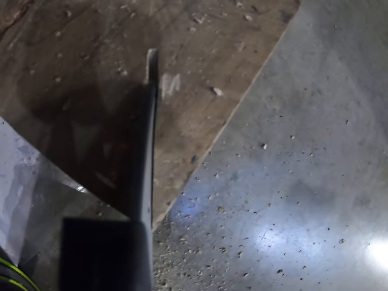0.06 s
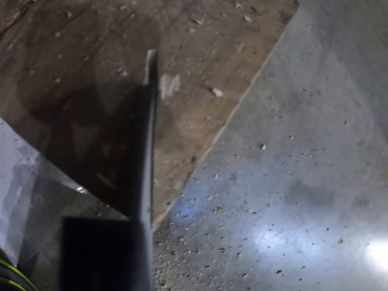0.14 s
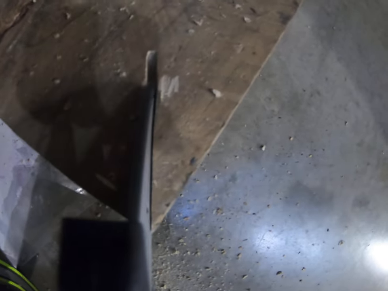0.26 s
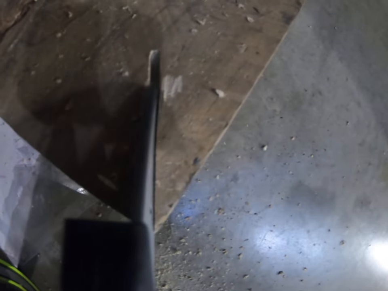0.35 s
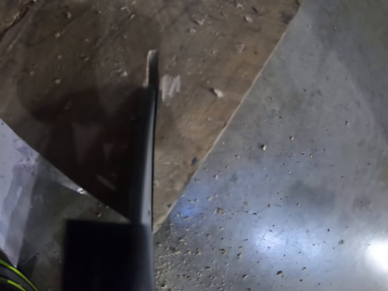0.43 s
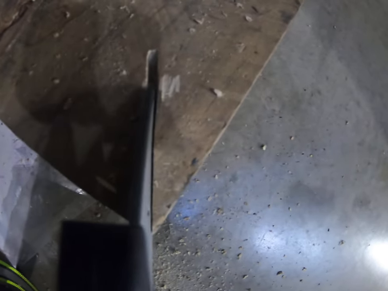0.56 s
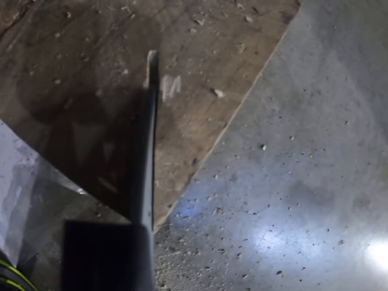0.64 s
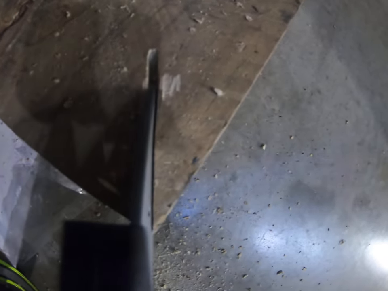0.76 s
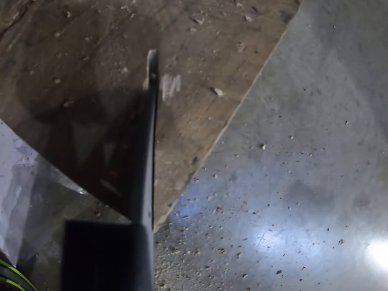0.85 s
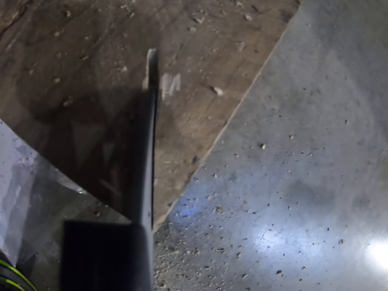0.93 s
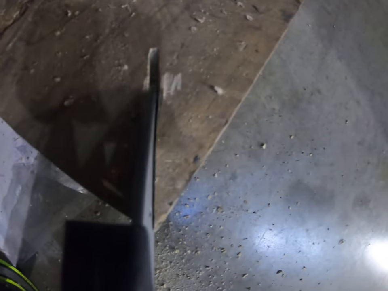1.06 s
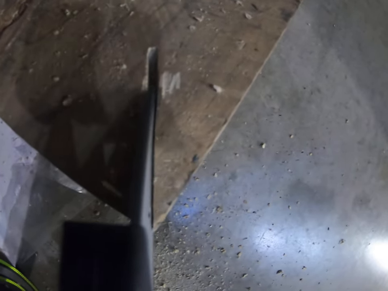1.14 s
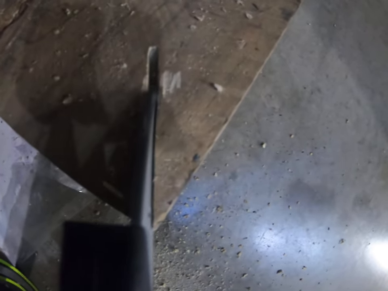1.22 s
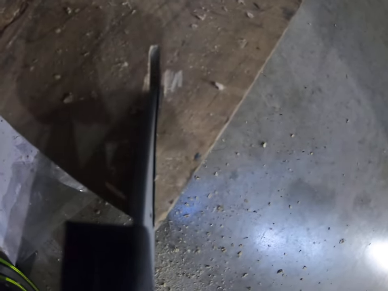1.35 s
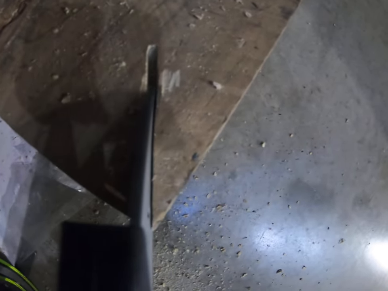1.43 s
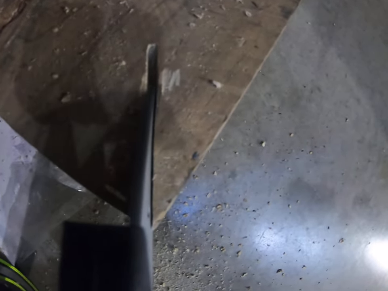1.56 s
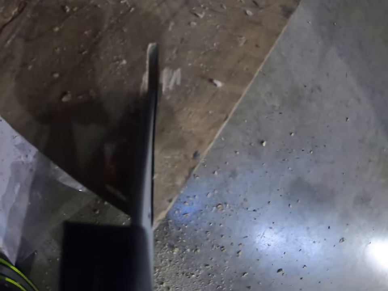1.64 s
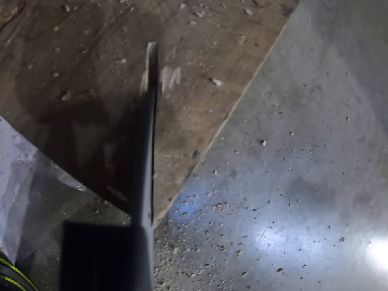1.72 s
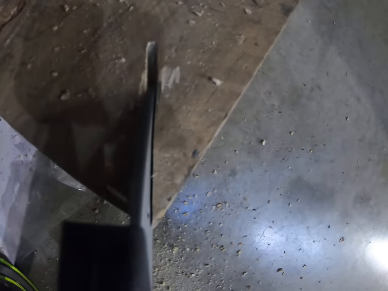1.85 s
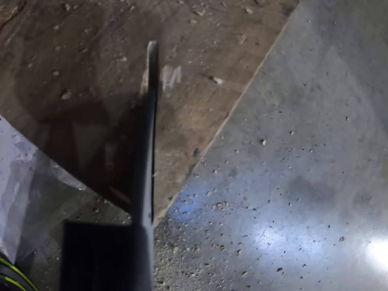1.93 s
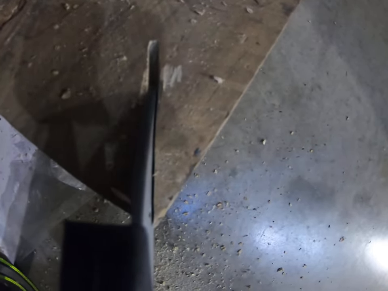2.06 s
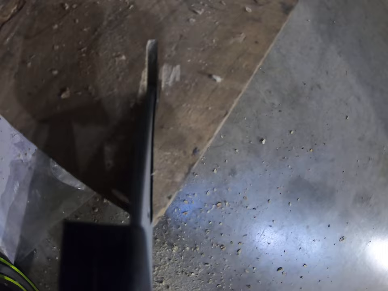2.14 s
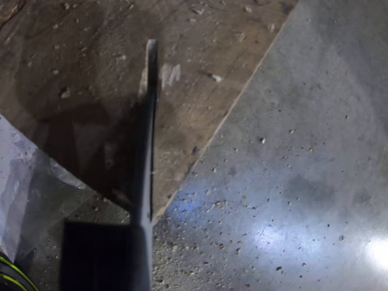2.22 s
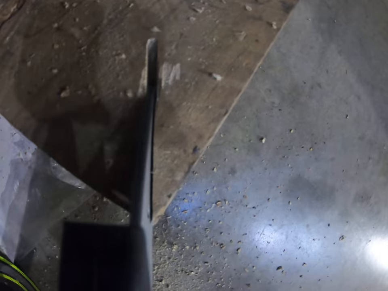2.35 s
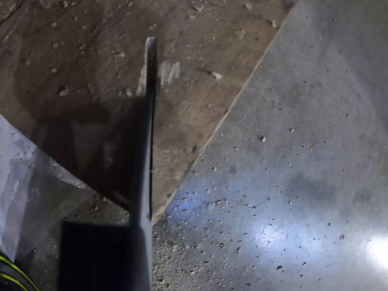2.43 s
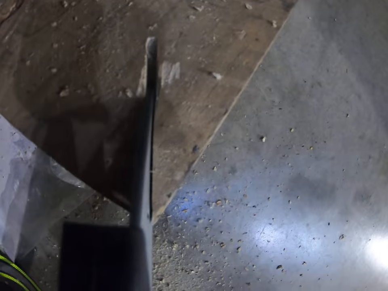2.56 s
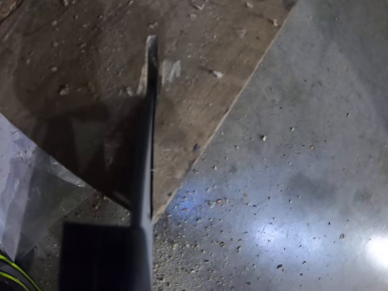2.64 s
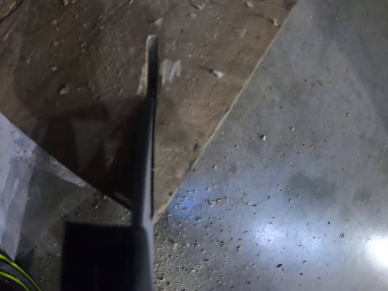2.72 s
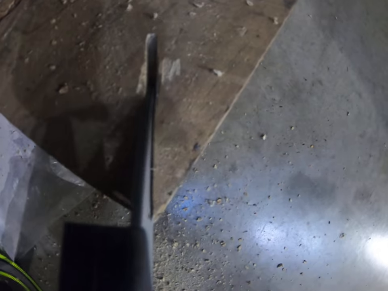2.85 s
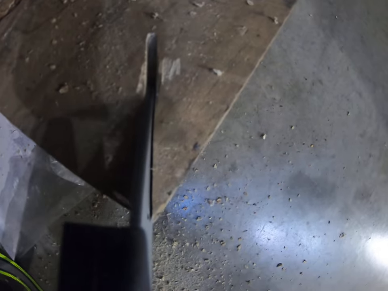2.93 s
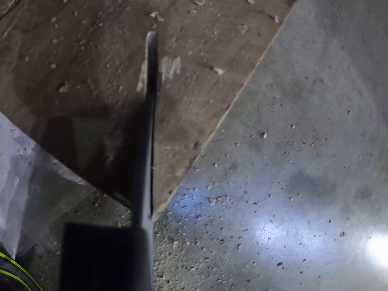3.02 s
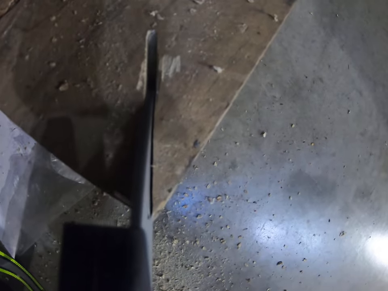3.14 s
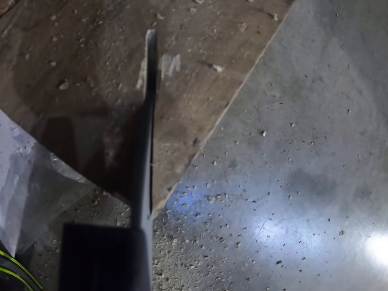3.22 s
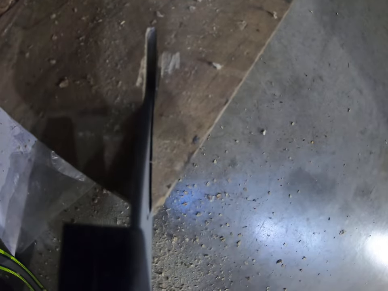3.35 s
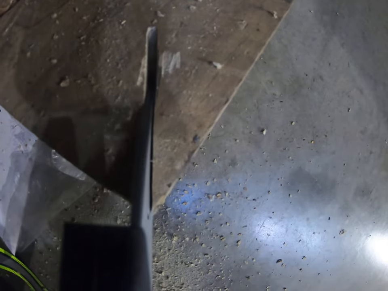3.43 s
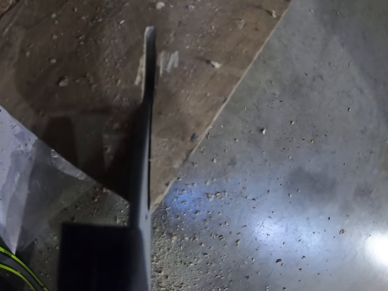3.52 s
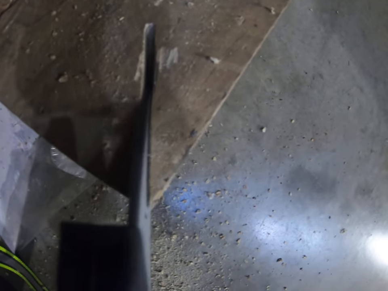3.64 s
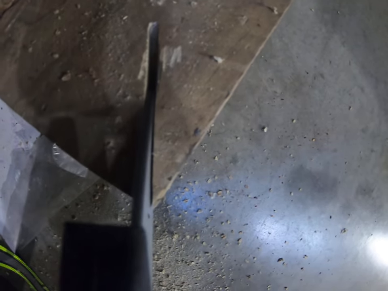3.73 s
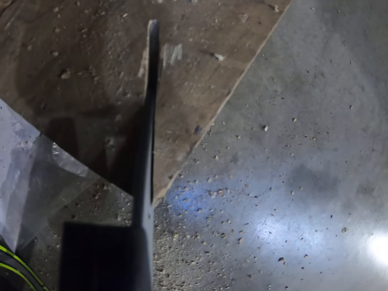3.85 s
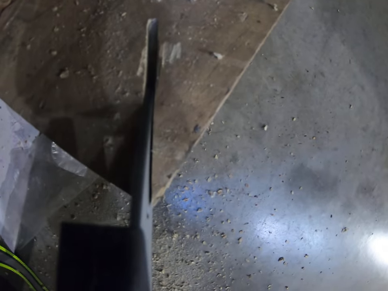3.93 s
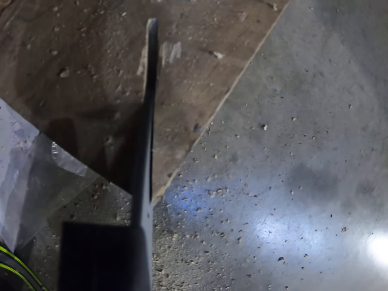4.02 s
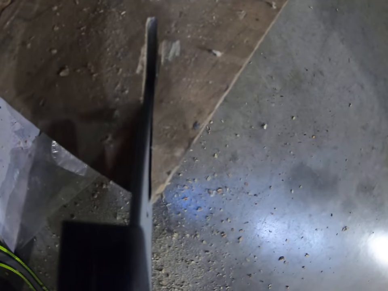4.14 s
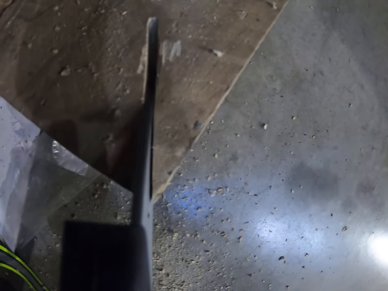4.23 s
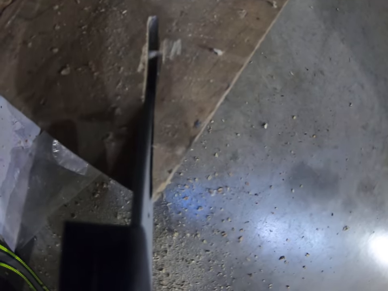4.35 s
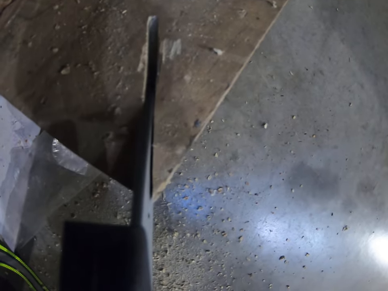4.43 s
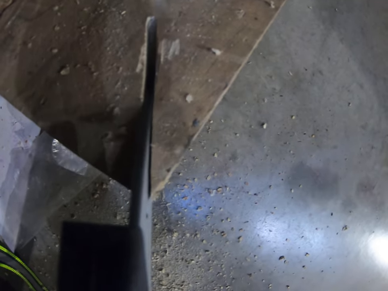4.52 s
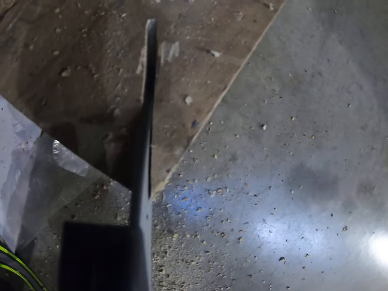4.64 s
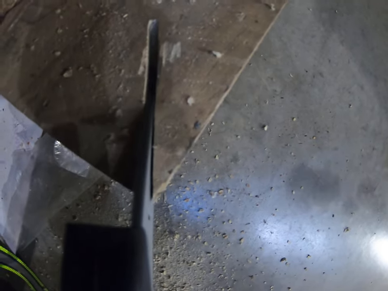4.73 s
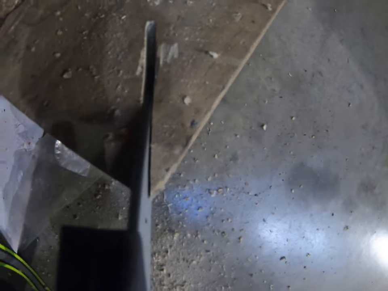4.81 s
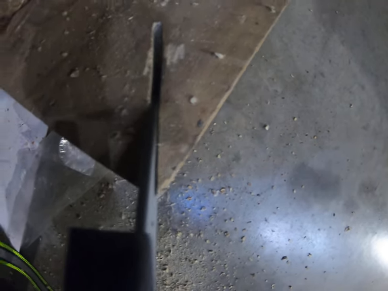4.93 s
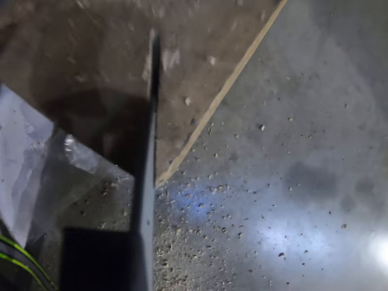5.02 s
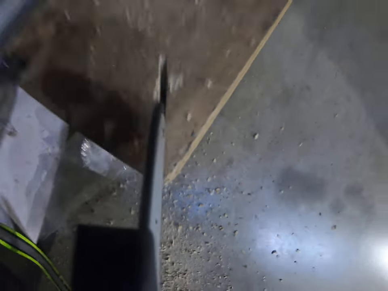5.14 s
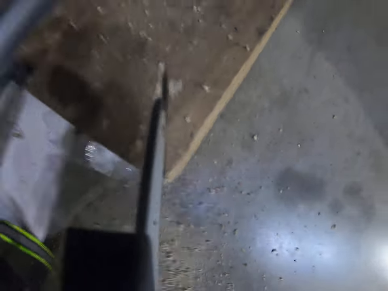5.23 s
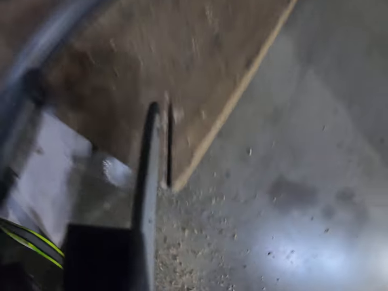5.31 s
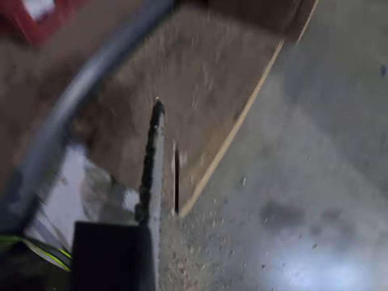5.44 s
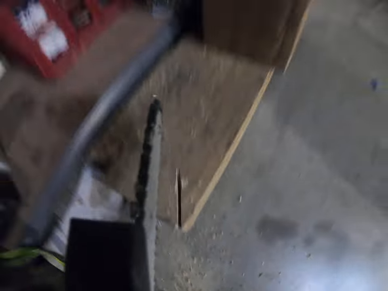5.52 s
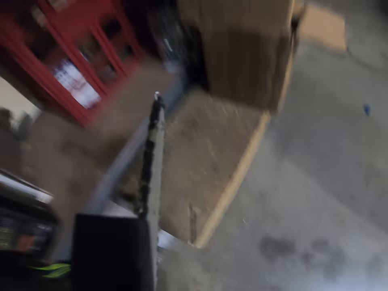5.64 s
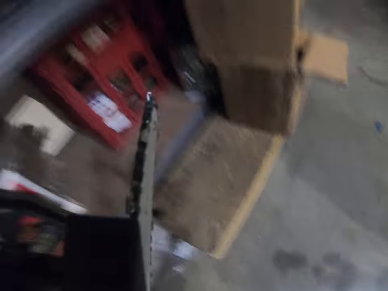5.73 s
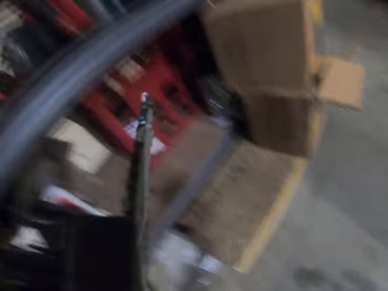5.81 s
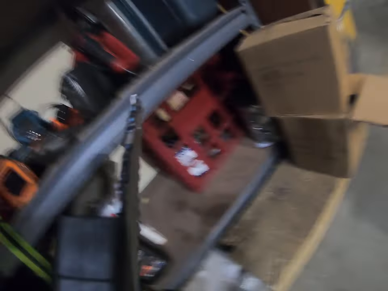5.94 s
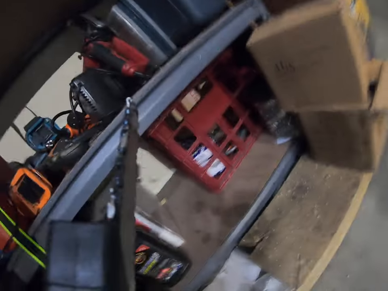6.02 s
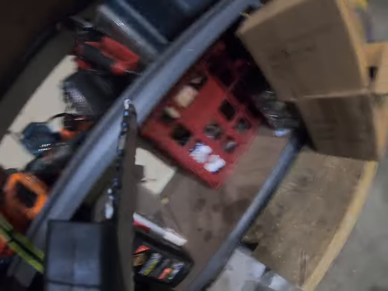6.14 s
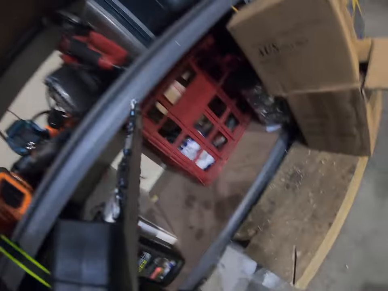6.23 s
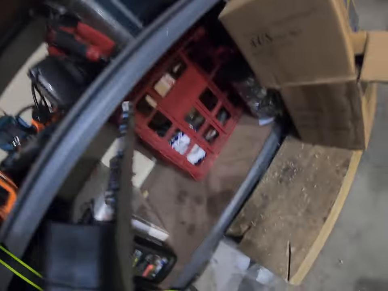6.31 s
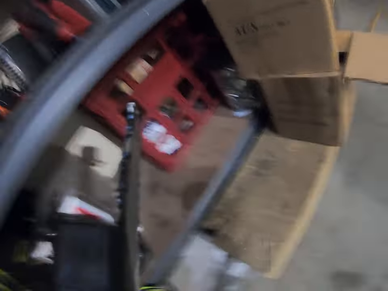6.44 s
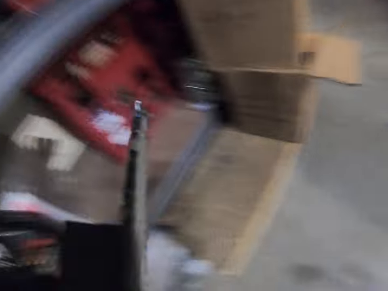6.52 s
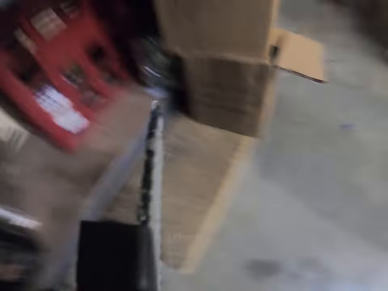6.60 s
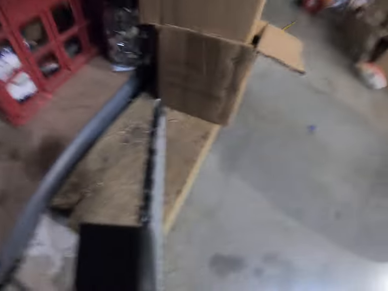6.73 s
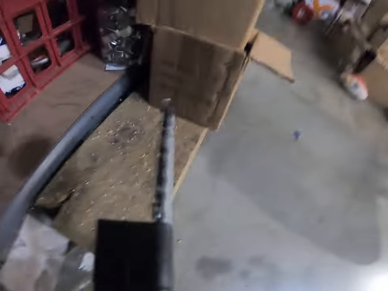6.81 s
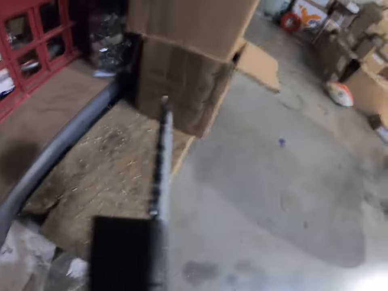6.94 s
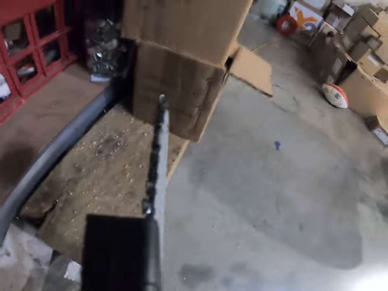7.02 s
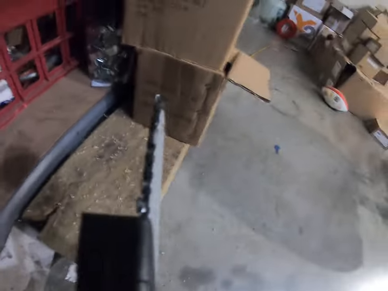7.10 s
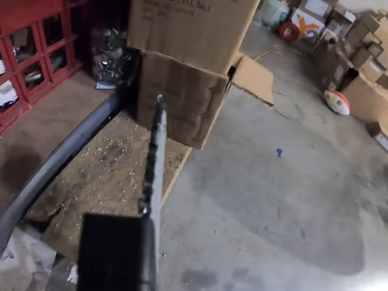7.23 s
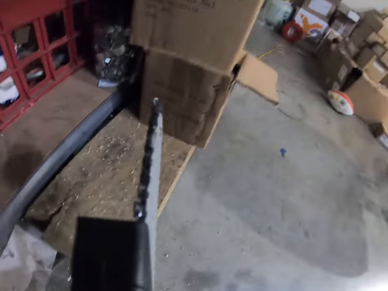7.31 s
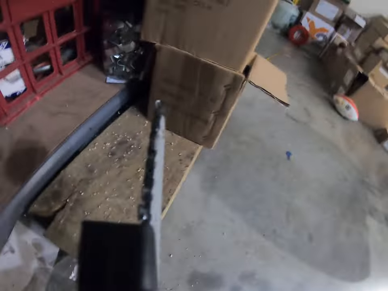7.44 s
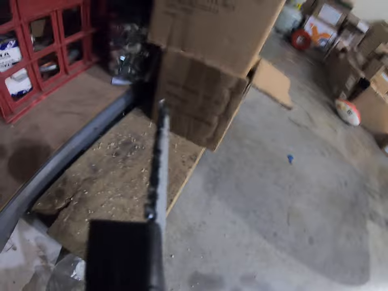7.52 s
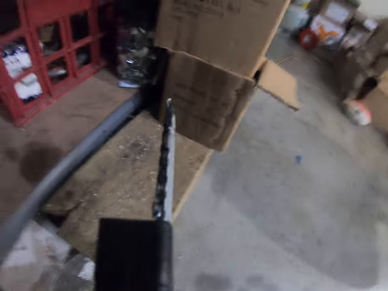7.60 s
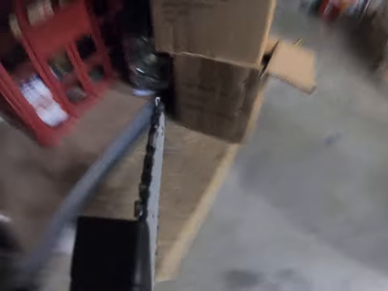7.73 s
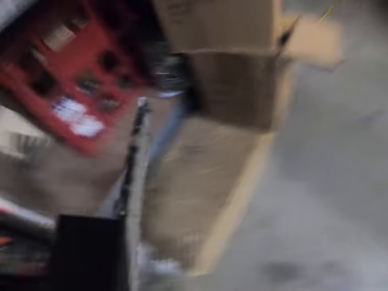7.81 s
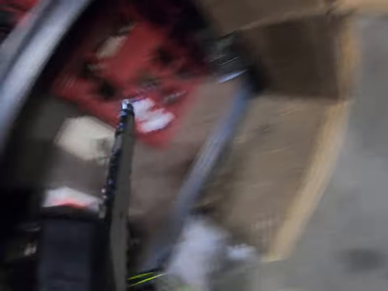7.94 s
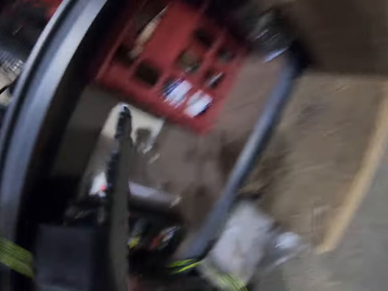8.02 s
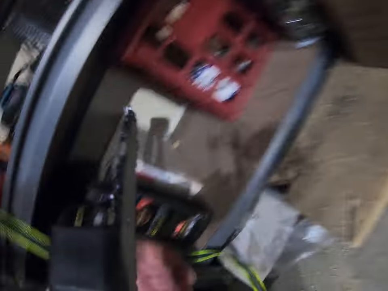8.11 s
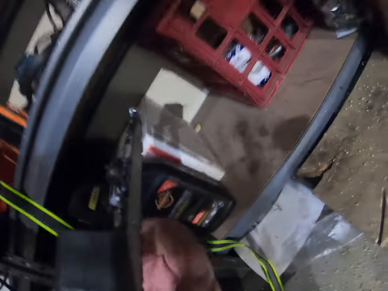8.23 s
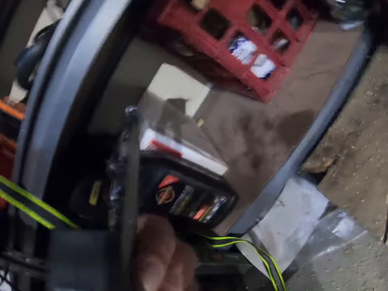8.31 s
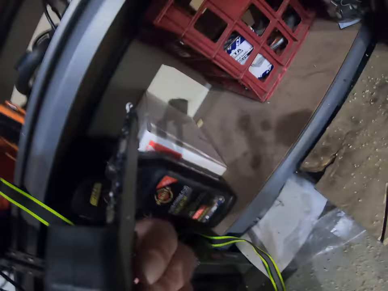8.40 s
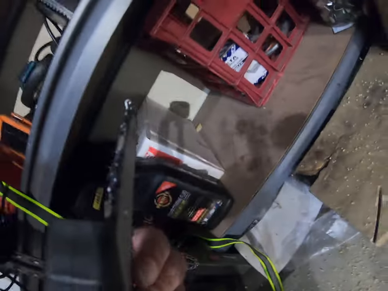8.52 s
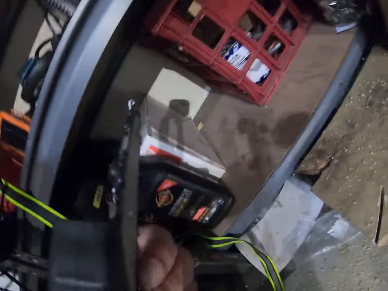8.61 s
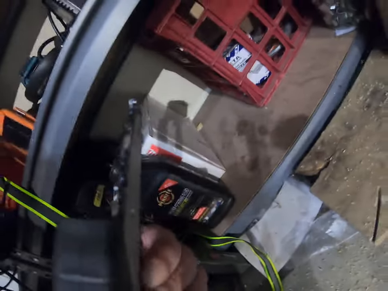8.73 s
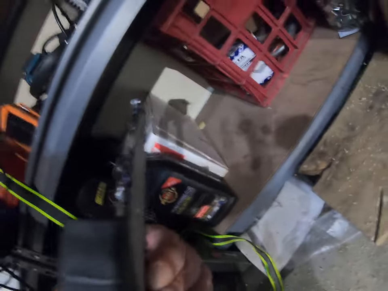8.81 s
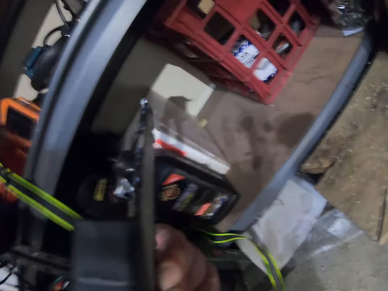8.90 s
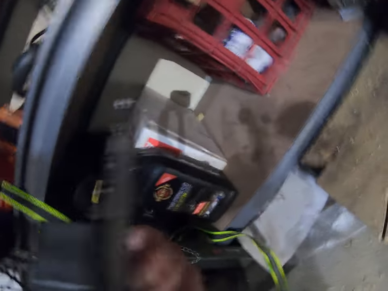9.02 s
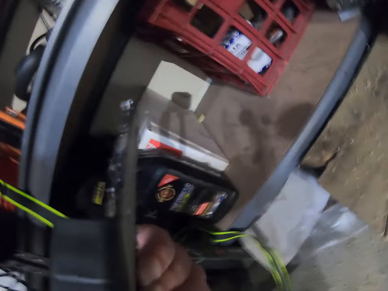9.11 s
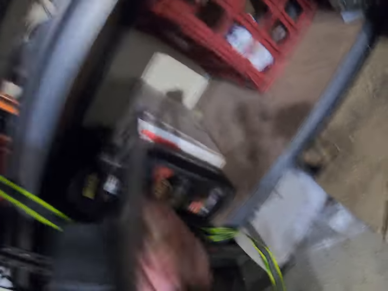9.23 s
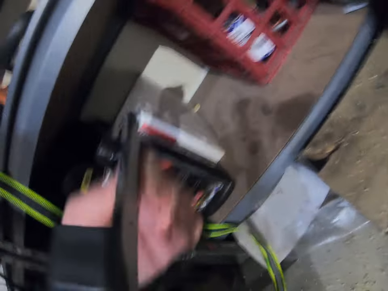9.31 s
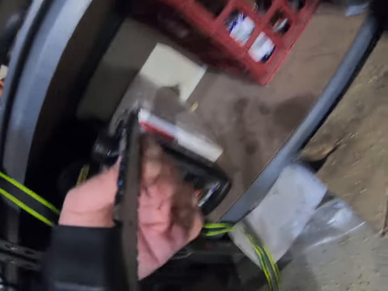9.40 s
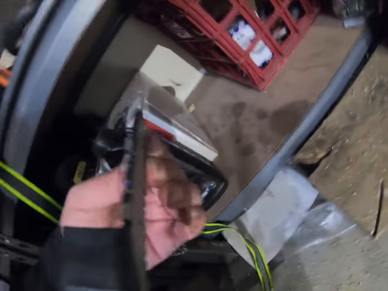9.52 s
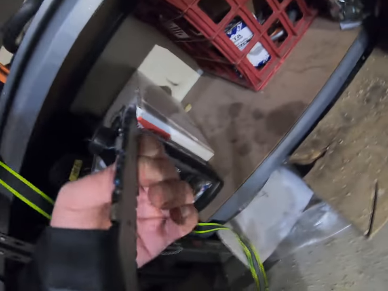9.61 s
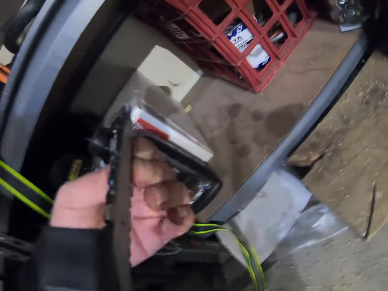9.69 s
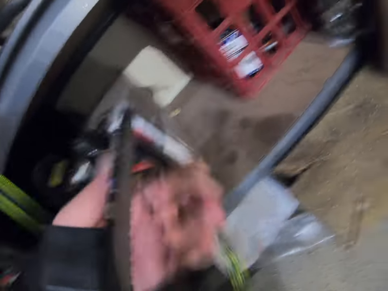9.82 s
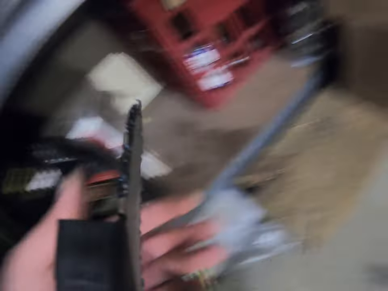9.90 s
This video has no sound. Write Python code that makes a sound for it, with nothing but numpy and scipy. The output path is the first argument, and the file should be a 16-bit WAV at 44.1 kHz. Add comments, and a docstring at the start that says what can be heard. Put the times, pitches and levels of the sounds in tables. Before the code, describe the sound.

A small electric chainsaw clatters and whines loudly in a garage, stops dead, then loose chain knocks, sliding and one short rattle follow in near quiet.

```python
"""In a garage, a small electric chainsaw runs free: links clatter round the bar and ring the plastic housing.
The slack chain shakes the bar less and less, then the brake stops it at once.
The saw is turned about: the chain knocks and slides, a hand brushes it, and the chain makes one short
rattling run. Random impacts and hiss, coloured by each body, make nearly all of the sound; a sine adds
the motor's hum. The garage answers with dense reflections over faint, steady air noise."""
import sys
import numpy as np
from scipy import signal
from scipy.fft import rfft, irfft
from scipy.io import wavfile
from scipy.ndimage import uniform_filter1d, minimum_filter1d

SR = 44100
rng = np.random.default_rng(int(sys.argv[2]) if len(sys.argv) > 2 else 0)


def wrap_up_sound(samples):
    """Save the sound to the file named by the first command line argument, as 16-bit audio."""
    columns = np.atleast_2d(samples).T
    # keep every value between -1 and 1, then stretch to whole-number steps
    tamed = np.clip(columns, -1, 1)
    steps = np.round(tamed * 32767).astype(np.int16)
    wavfile.write(sys.argv[1], SR, steps)


N = 439236
T = np.arange(N) / SR  # the time of every sample, in seconds
HZ = np.fft.rfftfreq(8192, 1 / SR)  # the pitches at which the bodies are described

# How strongly the chain's steel and the housing pass each pitch when knocked: pitch_hz, level_db
KNOCK_COLOUR = [(200, -40), (430, -24.5), (650, -10), (950, -12), (1300, 3), (1750, 6), (2100, -16.5),
                (2900, -12), (4200, -18.5), (5300, -24), (6200, -31), (8400, -27), (11000, -40),
                (15000, -58)]


def running_saw():
    """Links strike sprocket and bar, harder once every turn; the slack chain shakes bar and housing."""
    # How hard the slack chain whips the bar: time_s, level_db
    whip_strength = [(0, 0), (1.4, -1), (3.05, -2.5), (3.4, -5), (4.1, -8.5), (4.45, -15.5), (5.27, -19.5)]
    # How far the chain has settled into the bar: time_s, share (0 slack, 1 seated)
    seating = [(0, 0), (1.2, .05), (3.4, 0.81), (4.2, 0.81), (4.5, 0.92), (5.3, 1)]
    # Colour of the low thud: pitch_hz, level_db
    thud_colour = [(15, -20.5), (35, -22), (55, -8), (100, 2.5), (140, 0.5), (195, -1), (235, -20),
                   (330, -24), (700, -56)]
    # Colour of the fluttering bar: pitch_hz, slack_db, seated_db
    flutter_colour = np.array([(120, -40.5, -36), (283, -17, -9), (338.6, -1.5, 2.5), (351, 0.5, -5.5),
                               (398, -6.5, -4), (496, -5, -16.5), (515, -4.5, -14), (567, -12.5, 1),
                               (597, -5, -1), (661, -18, 4), (717, -18, -2), (800, -17, -2),
                               (1120, -26, -16.5), (2480, -52, -53.5)])
    sprocket_hz = 49.54
    brake_s, brake_db_per_s = 5.27, 410

    whip_db = curve(whip_strength)[0] + 0.56 * wander(hz=6.9)
    settled, = curve(seating)
    turn = 2 * np.pi * np.cumsum(sprocket_hz * (1 + 0.0085 * wander(hz=2.6))) / SR
    slap = amp(0.65 * np.cos(turn) + 1.0 * wander(hz=45))
    links = slap * clatter(per_s=1400, share=0.18)

    # The housing booms in lumps as the chain whips; the steel itself hisses more evenly.
    slack, seated = housing_colours()
    treble = 1 / (1 + (2200 / (HZ + 1)) ** 8)
    low_db = 20 * np.log10(1 - treble + 1e-9)
    high_db = 20 * np.log10(treble + 1e-9)
    lumps = amp(0.65 * np.cos(turn) + 0.28 * wander(hz=70))
    boom = seat(links * lumps, slack + low_db, seated + low_db, settled)
    hiss = seat(links, slack + high_db, seated + high_db, settled)
    # Both gain a little level as the chain seats.
    chain = amp(-19.5 + 0.7 * settled) * boom + amp(-25.5 + 1.33 * settled) * hiss

    # Each shaking sound follows the whip by its own number of dB per dB.
    whip = amp(1.3 * wander(hz=25.7)) * clatter(per_s=260, share=0.37)
    thud = amp(-28 + 1.1 * whip_db) * unit(ring(whip, read(thud_colour)))

    # The power of 6 keeps the slack colour until the chain is nearly seated.
    slack_bar, seated_bar = read(flutter_colour[:, [0, 1]]), read(flutter_colour[:, [0, 2]])
    flutter = amp(-27.5 + 0.22 * whip_db) * seat(whip, slack_bar, seated_bar, settled ** 6)
    flutter = flutter * release(4.35, db_per_s=8)

    bar_hz, bar_half_width_hz = 931.8, 31.8
    bar_colour = -20 * np.log10(1 + ((HZ - bar_hz) / bar_half_width_hz) ** 2)
    bar_ring = unit(ring(slap * clatter(per_s=300, share=0.63), bar_colour))
    # The bar's ring dies just before the stop.
    bar = amp(-24.5 + 0.25 * whip_db) * bar_ring * release(5.03, db_per_s=90)

    # The motor hums at twice the turning rate and outlasts the brake a little.
    hum = amp(-40.5 + 2.4 * wander(hz=10)) * np.sin(2 * turn) * release(brake_s, db_per_s=92)
    return release(brake_s, brake_db_per_s) * (chain + thud + flutter + bar) + hum


def housing_colours(ripple_db=1.64):
    """Gain of the housing, slack and seated: broad shape, narrow resonances and many small ones."""
    # Broad colour of the housing: pitch_hz, slack_db, seated_db
    broad = np.array([(398, -28.5, -32.5), (1042, -16, -19), (1371, -5.5, -10.5), (1453, -3, -1.5),
                      (1727, 1, 0), (1854, -6.5, -10), (2150, -11.5, -10), (3430, -14, -13),
                      (4910, -25, -21), (7200, -20.5, -21.5), (9830, -25.0, -24), (11740, -40, -38.5),
                      (14000, -45, -45), (15500, -51, -57.5)])
    # Its narrow resonances: pitch_hz, width_hz, slack_db, seated_db
    peaks = np.array([(1128, 190, 10.5, 13), (2340, 160, 5, 4.5), (2856, 92, 6.5, 5), (3570, 130, 4, 4.5),
                      (4100, 320, 5.5, 5.5), (4585, 220, 7.5, 4), (5000, 300, 6, 2.5),
                      (5674, 320, 7.5, 6.5), (6540, 660, 3.5, 3), (7260, 510, 4.5, -0.5),
                      (8600, 350, 4.5, 1.0)])
    bells = 1 / (1 + (2 * (HZ[:, None] - peaks[:, 0]) / peaks[:, 1]) ** 2)
    small = ripple_db * ripple()
    return [read(broad[:, [0, k]]) + bells @ peaks[:, k + 1] + small for k in (1, 2)]


def seat(x, slack_db, seated_db, share):
    """Rings x through a body whose colour moves from slack to seated."""
    share = np.clip(share, 0, 1)
    return (1 - share) * unit(ring(x, slack_db)) + share * unit(ring(x, seated_db))


def knocks(rise_s=0.0032, fall_s=0.0038, blow_db=3, chatter=0.27):
    """Links of the loose chain chatter, seat with a blow and ring the housing."""
    # Each knock: time_s, peak_db, then middle snap_db and high tick_db against the low clack
    knock_list = [(5.297, -19, -14, -27), (5.502, -47, 2, -18), (5.691, -41, -12, -27),
                  (5.731, -50, -25, -30), (5.777, -50, -25, -30), (5.8817, -35.5, -5.5, -17),
                  (6.072, -48, -22, -38), (6.236, -45, -17, -38), (6.25, -38, -17, -38),
                  (6.2615, -29, -9, -24), (6.3063, -30.5, -12, -28), (6.324, -35.5, -11, -31),
                  (6.374, -37, -14, -31), (6.3915, -24.5, 4, -41), (6.518, -37, -9, -29),
                  (6.544, -39, -3, -26), (6.7078, -39, -3, -14), (6.7498, -31.5, -9, -27),
                  (6.916, -37.5, 0, -24), (7.017, -49, -1, -22), (7.19, -35.5, -4, -22),
                  (7.371, -41.5, -4.5, -22), (7.418, -22, -6.5, -23), (7.427, -13, -9.5, -33),
                  (7.4363, -7.5, 0.5, -20), (7.569, -36.5, 5, -17), (7.724, -38, -19, -21),
                  (7.973, -46.5, -1, -19), (8.018, -44.5, -1, -17), (8.2415, -40, 13, 18),
                  (8.4845, -47, -4.5, -12), (8.65, -47.5, 0.5, -5), (8.82, -51, -8.5, -16.5),
                  (8.856, -44, -6, -21), (8.8837, -46, -10, -25), (9, -32, -5, -10.5),
                  (9.01, -34, -12, -18.5), (9.086, -50, -20, -30), (9.1165, -34, -16, -20),
                  (9.168, -24, -12, -22), (9.198, -21, -6, -13), (9.2297, -23, -12, -11),
                  (9.2538, -21, -16, -10), (9.279, -17.5, -22, -30), (9.3166, -18, -21, -19),
                  (9.435, -48.5, -24, -27.5), (9.475, -48.5, -22.5, -32), (9.717, -55, -10, -15),
                  (9.7602, -58, -5, -12)]
    # Resonances that a blow wakes: pitch_hz, width_hz, level_db
    blow_rings = [(1240, 28, 2), (1365, 48, 6), (1670, 86, 0), (2120, 90, 6.5), (2620, 90, 0.5),
                  (2950, 100, 6), (3730, 120, 0)]
    t = np.arange(-SR // 25, SR // 16) / SR  # seconds around the blow
    out = np.zeros(N + len(t))
    edges = [((750, 2200), "band"), ((2200, 5500), "band"), (5500, "high")]  # clack, snap, tick
    bands = [signal.butter(4, hz, kind, fs=SR, output="sos") for hz, kind in edges]
    rings_db = sum(db / (1 + (2 * (HZ - hz) / width) ** 2) for hz, width, db in blow_rings)
    for s, peak_db, snap_db, tick_db in knock_list:
        touches = rng.standard_normal(len(t)) * (rng.random(len(t)) < chatter)
        contact = touches * np.exp(np.where(t < 0, t / rise_s, -t / fall_s))
        contact[np.argmin(abs(t))] += amp(blow_db)
        # Every blow lands elsewhere and wakes other small resonances.
        body = ring(contact, read(KNOCK_COLOUR) + rings_db + 1.2 * ripple())
        levels = (0, snap_db, tick_db)
        knock = sum(amp(db) * unit(signal.sosfilt(band, body)) for band, db in zip(bands, levels))
        peak = np.sqrt(uniform_filter1d(knock ** 2, size=88).max())  # loudest 2 ms
        start = round((s + t[0] + .0008) * SR)
        out[start:start + len(t)] += amp(peak_db) * knock / peak
    return out[:N]


def rattle():
    """The chain gathers speed, runs a short way with single links heard, and is stopped."""
    # Colour of the rattling chain: pitch_hz, level_db
    rattle_colour = [(150, -67), (250, -34), (330, -15), (372, -31), (613, -14.5), (768, -20), (944, -22),
                     (1240, -4), (1380, -1), (1760, -5), (2120, -24), (3330, -16.5), (4540, -28),
                     (9540, -28.5), (15500, -70)]
    start_s, rise_s, stop_s = 9.105, 0.045, 9.28
    speed = 1 - np.exp(-np.maximum(T - start_s, 0) / rise_s)
    links = clatter(per_s=430, share=0.18) * amp(0.9 * wander(hz=110))
    run = unit(ring(links, read(rattle_colour)))
    return amp(-23.3) * speed * release(stop_s, db_per_s=698) * run


def sliding_chain(steel_ripple_db=3.5, jiggle_db=-7):
    """The chain slips along the steel groove; now and then a link ticks."""
    # Slides in the groove, each time the saw is tipped: start_s, length_s, level_db
    slide_list = [(5.6, 0.26, -60), (6.18, 0.36, -54.5), (6.44, 0.29, -47.5), (6.66, 0.26, -53.5),
                  (7.08, 0.26, -49.5), (7.25, 0.46, -53), (7.44, 0.31, -50), (7.62, 0.35, -57),
                  (8.3, 0.85, -64.5)]
    # Colour of steel sliding on steel: pitch_hz, level_db
    slide_colour = [(120, -16.5), (190, -6), (300, -12.5), (430, -26), (600, -15.5), (850, -20.5),
                    (1300, -11), (1620, -3.5), (2070, -14.5), (2600, -14.5), (3600, -13.5), (5250, -23),
                    (5800, -32.5), (7400, -32), (8200, -25), (9200, -43.5), (10600, -34), (12000, -56.5),
                    (15000, -61)]
    # Between the slides the chain creeps faintly, as long as the saw is turned.
    turn_start_s, turn_end_s, creep_db = 5.5, 8.03, -66.5
    turning = uniform_filter1d(1. * (T > turn_start_s) * (T < turn_end_s), size=4000)
    movement = np.hypot(strokes(slide_list, rise=.33), amp(creep_db) * turning)
    slips = clatter(per_s=390, share=.25) * amp(1.3 * wander(hz=40))
    slide = unit(ring(slips, read(slide_colour) + steel_ripple_db * ripple()))
    ticks = unit(ring(clatter(per_s=55, share=0.78), read(KNOCK_COLOUR)))
    return movement * (slide + amp(jiggle_db) * ticks)


def hands():
    """Rubbing and brushing skin, and soft bumps of the grip."""
    # The grip rubs in the hand: start_s, length_s, level_db
    rub_list = [(7.908, 0.061, -49.5), (7.97, 0.083, -53)]
    # A hand brushes the housing: start_s, length_s, level_db
    brush_list = [(8.17, 0.12, -61), (8.28, 0.2, -58), (9.86, 0.3, -69.5)]
    # Soft bumps of the grip: time_s, level_db
    bump_list = [(6.24, -48), (6.42, -56), (6.57, -57), (6.78, -54), (7.29, -49.5), (7.46, -45),
                 (8.03, -50), (8.24, -45), (8.35, -53.5), (8.65, -49.5), (9.014, -36.5), (9.25, -43.5)]
    # Colours of rub, brush and grip, each: pitch_hz, level_db
    rub_colour = [(180, -40), (300, -6), (781, -11), (1080, -3.5), (2070, -16), (3090, -13), (4070, -22),
                  (8290, -30), (12000, -47), (15600, -77), (22000, -120)]
    brush_colour = [(880, -48.5), (1500, -26.5), (2220, -12.5), (2860, 8), (4020, -6), (4980, 8), (6060, 0),
                    (10100, -1), (15500, -28.5)]
    grip_colour = [(12, -41.5), (20, -12.5), (76, 5), (109, -1), (131, -4.5), (166, -6), (206, -15.5),
                   (344, -24.5), (400, -32), (520, -62), (880, -120)]

    rub_sound = unit(ring(clatter(per_s=160, share=0.42), read(rub_colour)))
    rub = strokes(rub_list, rise=0.47) * rub_sound
    brush_sound = unit(ring(clatter(per_s=700, share=.15), read(brush_colour)))
    brush = strokes(brush_list, rise=0.32) * brush_sound

    bump_rise_s = 0.017
    bumps = 0
    for s, db in bump_list:
        swell = np.clip((T - s) / bump_rise_s, 0, 1)
        bumps = bumps + amp(db) * swell * release(s + bump_rise_s, db_per_s=101)
    hold = amp(-65 + 3 * wander(hz=6))  # the hold between the bumps wavers slowly
    grip = np.hypot(bumps, hold) * unit(ring(rng.standard_normal(N), read(grip_colour)))
    return rub + brush + grip


def strokes(rows, rise):
    """Gain of movements: each swells for the given share of its length, then fades."""
    return sum(amp(db) * np.interp(T, [s, s + rise * length, s + length], [0, 1, 0])
               for s, length, db in rows)


def garage(x):
    """Dense reflections from the garage, each band dying at its own speed."""
    # How the garage echoes: pitch_hz, time to fall by 60 dB (t60_s), level_db
    echo_bands = [(150, .5, -4.5), (450, .4, -15.5), (900, .65, -1.5), (1504, 0.28, -15.5), (2202, 0.57, 7),
                  (2893, 0.47, 3.5), (5010, 0.57, 2.5), (8300, 0.49, 4), (9200, .45, 0), (11500, .3, -2.5),
                  (15000, .25, -14.5)]
    # Random echoes begin after 8 ms.
    taps = rng.standard_normal(SR) * (rng.random(SR) < .12) * (T[:SR] > .008)
    hz, t, z = signal.stft(taps, SR, nperseg=256)
    f, t60, db = np.transpose(echo_bands)
    decay = amp(np.interp(hz, f, db)[:, None] - 60 * t / np.interp(hz, f, t60)[:, None])
    tail = signal.istft(z * decay, SR, nperseg=256)[1]
    return signal.fftconvolve(x, tail / np.linalg.norm(tail))[:N]


def background_air():
    """Steady random noise, strongest in the bass, stands for the air of the garage."""
    # Colour of the air noise: pitch_hz, level_db
    air_colour = [(15, -24.5), (25, -5.5), (193, -11), (495, -30.5), (825, -28), (995, -37.5), (1370, -28),
                  (1570, -31), (7280, -43.5), (9530, -43), (15500, -71.5)]
    return amp(-60.5) * unit(ring(rng.standard_normal(N), read(air_colour)))


def ports(x):
    """Both microphone ports hear nearly the same, until a hand shadows the right one."""
    # A hand comes between the ports: time_s, share (0 to 1)
    hand_near = [(8.1, 0), (8.3, 0.5), (8.98, 1), (9.33, 1), (9.45, 0.3)]
    # Side sound against the middle, with the hand there: pitch_hz, level_db
    shadow_side = [(60, -9), (110, -10), (200, 0), (380, -15), (700, -3), (1290, -6), (2380, -18),
                   (4400, -17), (8120, -11), (15000, -5)]
    # Left minus right with the hand there: pitch_hz, difference_db
    shadow_left = np.array([(700, 2), (1200, 9.5), (1700, -0.5), (2300, -0.5), (15000, 2)])
    # Side sound against the middle, without the hand: pitch_hz, level_db
    open_side = [(100, -38), (1300, -63.5), (4400, -51), (8000, -42), (11000, -18.5), (13000, -1.5),
                 (15000, -3)]
    near = np.clip(curve(hand_near)[0], 0, 1)
    left, right = ears(x, shadow_side)
    # Half of the difference goes to each port.
    shadowed = np.array([shade(left, shadow_left * [1, .5]), shade(right, shadow_left * [1, -.5])])
    return (1 - near) * ears(x, open_side) + near * shadowed


def ears(x, side):
    """Two microphone ports: what differs between them arrives by a path 11 ms longer."""
    return x + np.array([[1], [-1]]) * shade(np.roll(x, round(.011 * SR)), side)


def clatter(per_s, share):
    """Separate impacts, with the given share of the power, over the hiss of sliding."""
    impacts = rng.standard_normal(N) * (rng.random(N) < per_s / SR)
    return np.sqrt(share) * unit(impacts) + np.sqrt(1 - share) * rng.standard_normal(N)


def ripple():
    """The many small resonances of a body, as a ripple of rms 1 that then fades towards the bass."""
    smooth = uniform_filter1d(uniform_filter1d(rng.standard_normal(len(HZ)), size=18), size=18)
    return unit(smooth) * np.clip(HZ / 4000, 0, 1)


def ring(x, db):
    """Passes x through a body with the gain db, which answers only after it is struck."""
    log_gain = np.log(amp(np.maximum(np.r_[db, db[-2:0:-1]], -100)))
    # This phase makes the body answer as early as it can (minimum phase).
    taps = np.fft.ifft(np.exp(np.conj(signal.hilbert(log_gain)))).real[:len(db)]
    return signal.oaconvolve(x, taps)[:len(x)]


def shade(x, points):
    """Colours x without delaying it."""
    return irfft(rfft(x) * amp(read(points, np.fft.rfftfreq(N, 1 / SR))), N)


def read(points, hz=HZ):
    """A spectrum, joined by straight lines on a log axis of pitch."""
    f, value = np.transpose(points)
    return np.interp(np.log(hz + 1), np.log(f + 1), value)


def curve(rows):
    """The columns of a table, joined by straight lines in time."""
    s, *columns = np.transpose(rows)
    return [np.interp(T, s, c) for c in columns]


def wander(hz):
    """Slow random drift of rms 1, up to about the given rate."""
    f = np.fft.rfftfreq(N, 1 / SR)
    return unit(irfft(rfft(rng.standard_normal(N)) * (f > 0) / (1 + (f / hz) ** 4), N))


def release(start_s, db_per_s):
    """Gain that holds at 1, then falls steadily in dB for up to 3 s."""
    return amp(-db_per_s * np.clip(T - start_s, 0, 3))


def amp(db):
    """Decibels to gain."""
    return 10 ** (np.asarray(db) / 20)


def unit(x):
    """Scales to rms 1."""
    return x / np.sqrt(np.mean(x ** 2) + 1e-20)


def scene(room_db=-20.0):
    """The saw close by, the garage behind it."""
    near = running_saw() + knocks() + rattle() + sliding_chain() + hands()
    return ports(near + amp(room_db) * garage(near) + background_air())


def record(dry):
    """A fast limiter holds down the highest peaks; then a filter removes what lies above 15.6 kHz."""
    ceiling = .6
    room_left = ceiling / np.maximum(abs(dry).max(0), ceiling)
    # The gain is lowered and smoothed over about 3 ms.
    limited = dry * uniform_filter1d(minimum_filter1d(room_left, size=131), size=131)
    lowpass = signal.firwin(511, 15600, window=("kaiser", 9), fs=SR)
    return signal.oaconvolve(limited, lowpass[None], "same")


dry = scene()
out = record(dry)
wrap_up_sound(out)
```